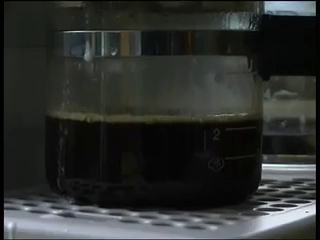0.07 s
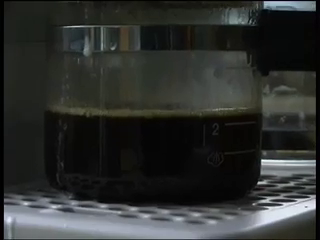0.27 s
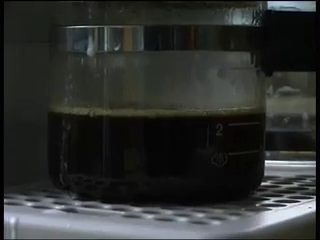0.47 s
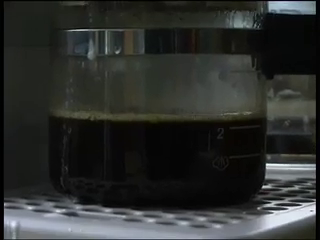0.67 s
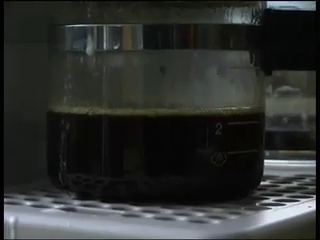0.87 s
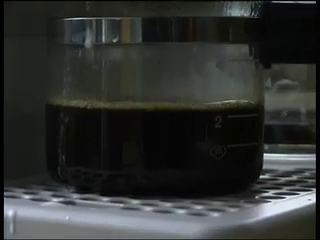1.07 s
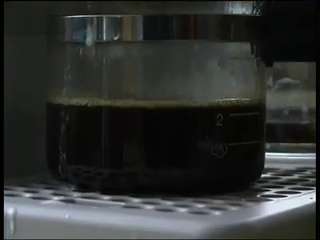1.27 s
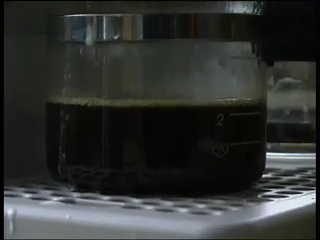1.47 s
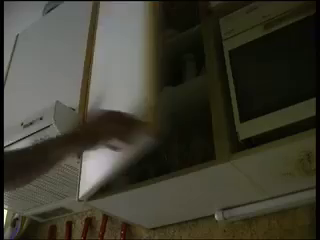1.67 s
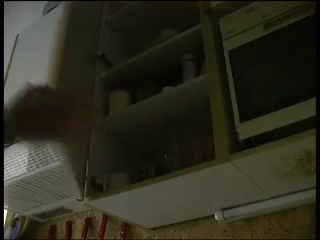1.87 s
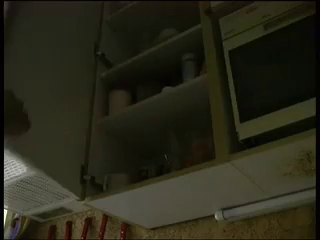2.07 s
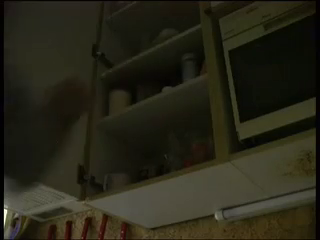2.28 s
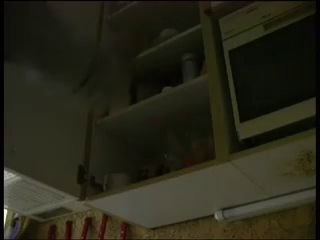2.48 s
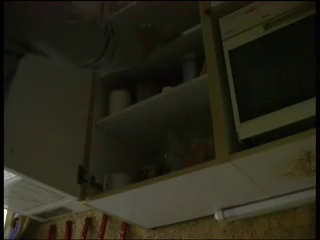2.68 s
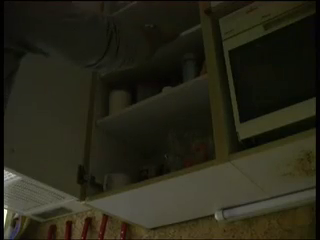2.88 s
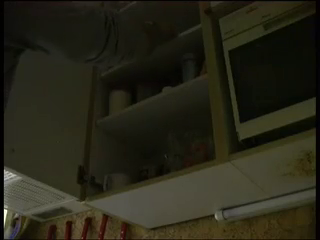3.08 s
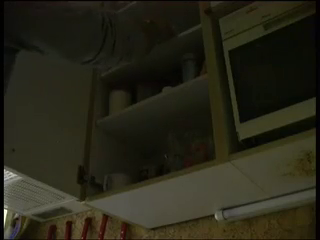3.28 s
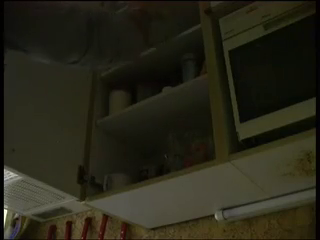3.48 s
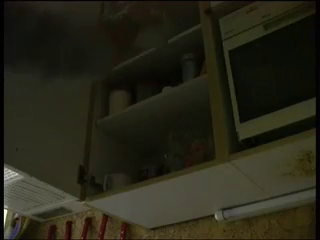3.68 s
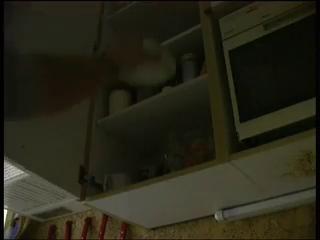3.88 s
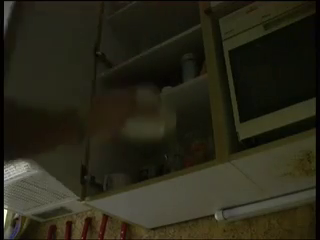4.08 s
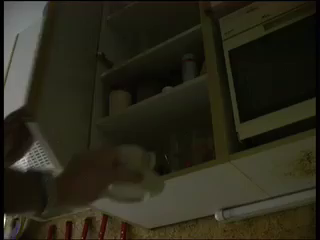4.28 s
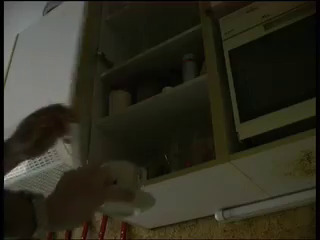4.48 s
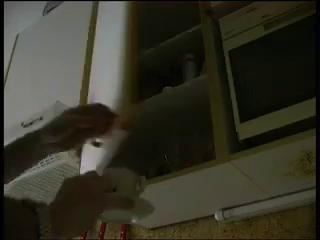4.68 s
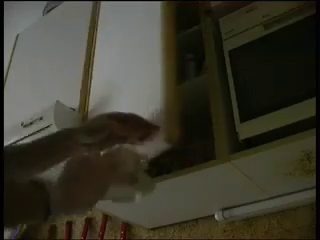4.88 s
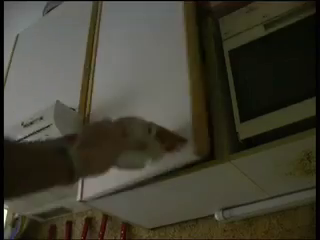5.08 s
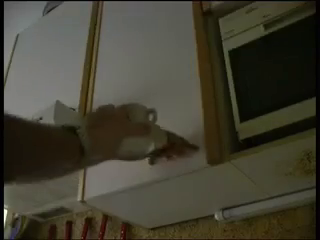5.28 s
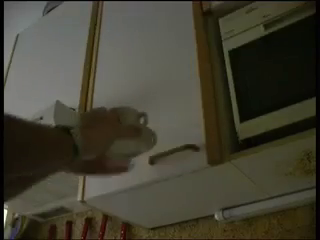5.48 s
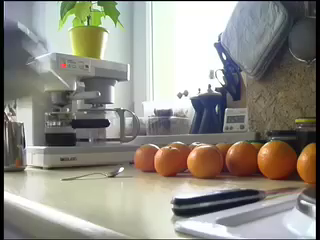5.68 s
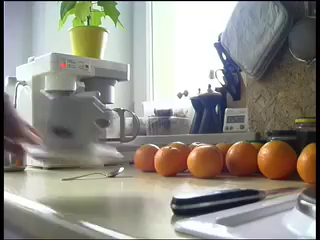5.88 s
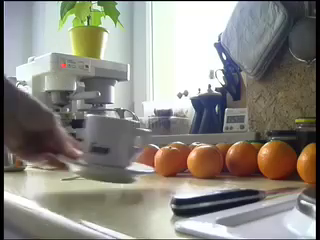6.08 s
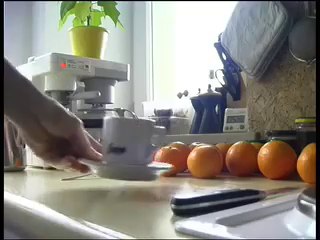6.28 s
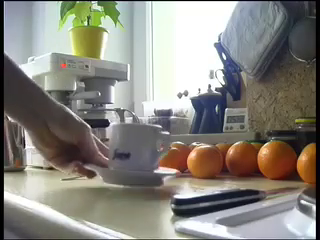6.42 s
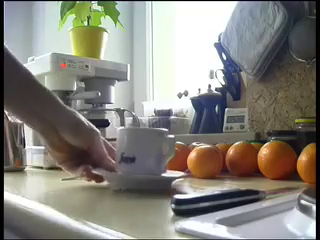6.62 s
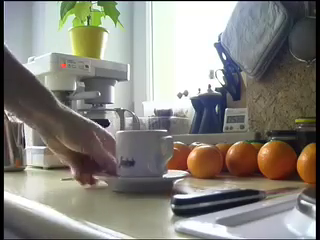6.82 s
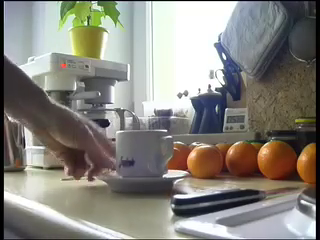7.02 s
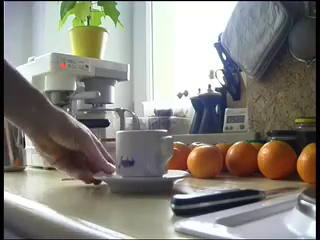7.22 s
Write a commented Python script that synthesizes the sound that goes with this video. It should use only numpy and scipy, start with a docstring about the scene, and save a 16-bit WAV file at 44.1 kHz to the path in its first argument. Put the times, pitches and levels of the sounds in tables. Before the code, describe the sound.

From 0 to 1.6 s a coffee maker is heard close up: quick irregular, hollow low-mid plops with tiny rebounds, over quiet simmer, low mains hum and faint hiss. At about 1.65 s the background changes and grows slightly fuller; plops become stronger but sparser, with soft low thuds and a brief high hinge hiss near 2.1 s. At 2.35 s a cupboard door knocks woodenly against its stop. Around 2.7 s a cup scrapes and clacks off the shelf. From 3 to 5 s there are gurgles, faint china ticks and sleeve brushes. At 5.3 s the door bangs shut, loudest of all, rattling glasses and leaving a low boom until 5.8 s. Then it is quieter, with dull china ticks, before crockery clacks on the counter at 6.6 and, brighter, 6.87 s. A few weak bubbles remain as the hiss sinks until about 7.4 s. Short room reverberation, mono.

```python
"""A drip coffee maker plops steam bubbles through its water pipe in a small kitchen, over mains hum and hiss.
Each plop is a short swelling sine with weaker rebounds that ring the housing; filtered noise simmers below.
A cupboard door swings open against its stop, a cup scrapes off the shelf, the door bangs shut, and cup and
saucer are set down on the counter in two clacks: noise bursts that excite modes of wood, glass and china.
Brushes, thuds and a low boom are shaped noise and a sine; a decaying noise tail gives the room."""
import sys
import numpy as np
from scipy import signal
from scipy.fft import rfft, irfft
from scipy.io import wavfile
from scipy.ndimage import uniform_filter1d

SR = 44100
rng = np.random.default_rng(int(sys.argv[2]) if len(sys.argv) > 2 else 0)


def generate_wav(sig):
    """Save sig (samples, or channels by samples) to the path in sys.argv[1] as 16-bit PCM at SR."""
    pcm = np.round(np.clip(np.atleast_2d(sig).T, -1, 1) * 32767).astype(np.int16)
    wavfile.write(sys.argv[1], SR, pcm)


N = 321930  # length in samples

# Steady sound in three stretches. Each row: start in seconds, then relative levels in dB of hum, hiss, simmer.
STRETCHES = [(0, -64, -61, -63.5), (1.63, -59, -60, -62), (5.79, -64, -61, -64.5)]


def undb(db):
    """Level to amplitude: 20 dB is a factor of ten."""
    return 10 ** (np.asarray(db) / 20)


def unit(x):
    """Normalisation to an RMS of 1."""
    return x / np.sqrt(np.mean(x ** 2))


def top(x, db):
    """Normalisation to a peak level in dB."""
    return x * undb(db) / np.max(np.abs(x))


def add(out, s, x):
    """Superposition: sound x is added to out from s seconds on."""
    a = max(int(s * SR), 0)
    out[a:a + len(x)] += x[:N - a]


def colour(x, points, tilt_db=0):
    """Minimum-phase filter, by cepstral folding, with the gain of (Hz, dB) points plus a tilt around 1 kHz."""
    hz = np.maximum(np.fft.rfftfreq(4096, 1 / SR), 20)
    p = np.array(points)
    gain_db = np.interp(np.log(hz), np.log(p[:, 0]), p[:, 1]) + tilt_db * np.log2(hz / 1000)
    cepstrum = irfft(np.log(undb(gain_db)))
    cepstrum[1:2048] *= 2  # fold the negative times onto the positive ones
    cepstrum[2049:] = 0
    impulse_response = irfft(np.exp(rfft(cepstrum)))
    return signal.fftconvolve(x, impulse_response)[:len(x)]


def band(x, hz, width):
    """Second-order resonance with gain 1 at its centre."""
    return signal.lfilter(*signal.iirpeak(hz, hz / width, SR), x)


def ring(x, modes, even=False):
    """Modal synthesis: decaying modes driven by x; even = each mode reaches its own peak dB."""
    out = 0
    for hz, db, t60 in modes:
        decay = np.log(1000) / (min(t60, .6) * SR)  # a fall of 60 dB in t60
        pole = np.exp(2j * np.pi * hz / SR - decay)
        mode = signal.lfilter([1], [1, -pole], x).imag
        out = out + (top(mode, db) if even else undb(db) * mode)
    return out


def walk(rate):
    """Slow random modulation: normal draws held 1 / rate seconds and smoothed over the same time."""
    k = int(SR / rate)
    held = np.repeat(rng.standard_normal(N // k + 1), k)
    return uniform_filter1d(held, k)[:N]


def stroke(t, length):
    """Asymmetric Gaussian envelope: a gesture swells fast and fades slower."""
    return np.exp(-(t / (length * np.where(t < 0, .7, 1.5))) ** 2)


def stretch_gain(column):
    """Stepwise gain per sample from one column of the stretches, smoothed into quick changeovers."""
    p = np.array(STRETCHES)
    row = np.searchsorted(p[:, 0] * SR, np.arange(N), side="right").clip(1) - 1
    return undb(uniform_filter1d(p[row, column], size=1500))


def coffee_maker():
    """Bubble collapse: a few cycles swell fast, die and rebound; the housing resonates, fed also by the simmer."""
    # Steam bubbles collapsing in the pipe. Each row: nominal peak time in seconds, relative peak level in dB.
    plops = [(0.003, -31), (0.035, -29), (0.052, -27.5), (0.11, -31.5), (0.143, -30.5), (0.205, -29.5),
             (0.241, -30), (0.258, -28), (0.322, -28), (0.47, -34), (0.534, -30), (0.603, -34.5),
             (0.612, -31), (0.622, -32), (0.691, -32), (0.703, -33.5), (0.815, -31), (0.865, -28.5),
             (1.006, -32), (1.019, -32), (1.08, -32.5), (1.086, -30.5), (1.106, -31.5), (1.112, -37),
             (1.131, -33.5), (1.19, -33), (1.3, -34.5), (1.312, -33), (1.56, -31), (1.657, -25),
             (1.722, -34), (1.744, -32.5), (1.813, -39), (1.952, -34), (1.997, -28.5), (2.034, -26),
             (2.135, -32.5), (2.149, -29), (2.229, -38), (2.33, -31), (2.579, -29), (2.919, -27.5),
             (2.935, -29), (2.995, -28), (3.144, -24.5), (3.164, -33), (3.522, -28), (3.59, -26.5),
             (3.609, -30.5), (3.941, -26.5), (4.006, -30), (4.151, -26), (4.16, -29), (4.207, -29.5),
             (4.215, -30.5), (4.511, -29), (4.766, -32.5), (4.799, -27), (4.813, -33), (4.826, -28),
             (4.959, -28), (5.04, -34), (5.048, -31.5), (5.071, -32), (5.182, -30.5), (6.329, -33.5),
             (6.351, -37), (6.356, -32), (6.395, -46), (6.801, -40), (6.809, -39), (7.074, -38),
             (7.107, -41), (7.118, -42)]
    # Modes of housing and jug. Each row: frequency in Hz, excitation level in dB, t60 in seconds.
    housing = [(185, -5, .22), (270, -15, .18), (410, -11, .18), (480, -19, .12), (565, -15, .15),
               (650, -18, .12), (700, -17, .12)]
    rebounds, rebound_s = 3, .011  # number, typical spacing in seconds
    first_loss_db, later_loss_db, scatter_db = -9.5, -5.5, 3
    rise_s, fall_s = .0012, .003
    out, t = np.zeros(N), np.arange(SR // 25) / SR
    shape = (1 - np.exp(-t / rise_s)) ** 2 * np.exp(-t / fall_s)
    peak = t[np.argmax(shape)]
    chance = rng.standard_normal((len(plops), rebounds + 1, 3))
    for (s, db), draws in zip(plops, chance):
        for k, (size, late, strong) in enumerate(draws):
            # the pipe sets the pitch, the bubble's size nudges it
            hz = 518 * (1 + (.12 if k else .05) * size)
            cycles = hz * (t - peak) * (1 + 1.0 * t)  # the bubble shrinks, so its pitch climbs a little
            plop = shape * np.sin(2 * np.pi * cycles + 0.25)
            add(out, s - peak - .0004, top(plop, db))
            s += rebound_s * np.exp(0.2007 * late)
            db += (later_loss_db if k else first_loss_db) + scatter_db * np.clip(strong, -1, 1)
    # the housing muffles the edge
    out = signal.sosfilt(signal.butter(3, 950, fs=SR, output="sos"), out)
    fizz = band(rng.standard_normal(N) * undb(2.9 * walk(55)), 520, 410)
    simmer = band(band(fizz, 550, 400), 620, 450)
    simmer = unit(simmer + undb(-32.5) * ring(fizz, housing))
    return out + undb(-44.5) * ring(out, housing) + simmer * stretch_gain(column=3)


def blows(rows, crack, modes, wares, modes_db, grit_db, rise_share, dull_db=0):
    """Impact excitation: a burst of uneven contacts gives a coloured crack and drives modes of wood and wares."""
    out, t = np.zeros(N), np.arange(SR * 3 // 4) / SR
    for s, db, rattle, tilt_db, *wares_db in rows:
        rise = rise_share * rattle  # a long rattle starts softer
        force = rng.standard_normal(len(t)) * undb(grit_db * walk(700)[:len(t)])
        force *= (1 - np.exp(-t / max(rise, 1e-4))) ** 2 * np.exp(-t / max(rattle, 1e-3))
        force[int(rise * SR)] -= 12 * np.exp(-rise / .001)  # a hard edge lands as one clean click
        x = top(colour(force, crack, tilt_db), 0)
        x += top(ring(force, modes, even=True), modes_db)
        for ware, ware_db in zip(wares, wares_db):
            # dull_db per octave above 2500 Hz
            muffled = [(hz, g - dull_db * np.log2(hz / 2500), t60) for hz, g, t60 in ware]
            x += undb(ware_db) * ring(force, muffled, even=True)
        add(out, s, top(x, db))
    return out


def cupboard_door():
    """Impact on wooden panels: the door hits its stop, then the cupboard frame, and shakes the glasses inside."""
    # Blows. Each row: start in seconds, relative peak level in dB, rattle decay constant in seconds,
    # crack tilt in dB per octave, gain in dB of the shaken glasses.
    opening = [(2.345, -16.5, 0.0064, 0.5, -52), (2.349, -9.5, 0.014, 2, -53),
               (2.364, -11.5, 0.022, -1, -36), (2.405, -32, 0.053, 3.5, -24)]
    shutting = [(5.274, -27.5, 0.0041, 2.5, -52), (5.285, -30.5, 0.036, 0, -53),
                (5.306, -15.5, 0.0062, -1.5, -50), (5.31, 0.5, 0.02, -1, -58), (5.334, -9, 0.025, 0.5, -32),
                (5.42, -25.5, 0.031, -3, -24)]
    # Modes of the door at its stop, the closed cupboard and the glasses.
    # Each row: frequency in Hz, relative peak level in dB, t60 in seconds.
    stop_modes = [(75, -6, .25), (91, 0, .25), (145, -8, .18), (221, -5, .1), (470, -11, .08),
                  (1020, -10, .07)]
    cupboard_modes = [(62, -7, .3), (82, -3, .28), (100, -1, .28), (150, -5, .2), (269, -3, .15),
                      (479, -6, .12), (754, -9, .08), (2300, -16, .05)]
    glass_modes = [(3130, -2, .22), (5450, -3, .05), (5600, -1, .08), (6290, -3, .045)]
    # Crack spectra before tilt. Each row: frequency in Hz, gain in dB.
    stop_crack = [(24, -48), (40, -9), (97, 9), (184, -7.5), (377, -2.5), (483, -15.5), (752, -13),
                  (830, -14.5), (1010, -17.5), (5540, -35.5), (14500, -55.5)]
    cupboard_crack = [(24, -39), (45, -17), (85, 0), (180, -9.5), (480, -13), (900, -16), (2200, -20.5),
                      (2900, -31), (5000, -36.5), (7500, -46), (13000, -52), (14500, -79)]
    out = blows(opening, stop_crack, stop_modes, [glass_modes], modes_db=-6.5, grit_db=1.0, rise_share=.14)
    out += blows(shutting, cupboard_crack, cupboard_modes, [glass_modes],
                 modes_db=-6.5, grit_db=3.0, rise_share=0.084)
    return out


def crockery():
    """Contact of stiff china with wood: a cup scrapes off the shelf, then cup and saucer clack onto the counter."""
    # Contacts. Each row: start in seconds, relative peak level in dB, rattle decay constant in seconds,
    # crack tilt in dB per octave, cup gain in dB; on the counter also saucer gain in dB.
    on_shelf = [(2.662, -34, 0.022, 0, -41), (2.678, -23.5, 0.02, 1, -14), (2.692, -16.5, 0.0092, 1.5, -18),
                (2.708, -21.5, 0.023, 0, -16), (2.742, -34.5, 0.019, -4, -13),
                (2.767, -34, 0.035, 1.5, -42)]
    on_counter = [(6.5848, -15.5, 0.0068, -1.6, -54, -27), (6.609, -23.5, 0.0079, -0.57, -35, -28),
                  (6.866, -20.5, 0.0064, -0.15, -40, -53), (6.87, -13, 0.012, 1, -21, -42.5),
                  (6.94, -34, 0.0089, -1.5, -29, -42)]
    # Modes of wood and china. Each row: frequency in Hz, relative peak level in dB, t60 in seconds.
    shelf_modes = [(487, -2, 0.1), (583, 3, 0.12), (738, 0.5, 0.14), (1020, 2, 0.062), (1542, -14, 0.22),
                   (1780, -11, 0.18)]
    counter_modes = [(235, -8.5, .12), (418, 3, 0.09), (650, -6, 0.08), (733, -3, 0.08), (1105, -4, 0.07),
                     (2040, -5.5, .08)]
    cup_modes = [(2440, -2, .12), (2490, -4, .1), (3381, -4, .07), (3666, -5, .35), (5350, -11, .11),
                 (5290, -12, .06), (7741, -6, .085), (7825, -9, .07), (8468, -17, .05), (11250, -14, .04)]  # levels before the muffling on the shelf
    saucer_modes = [(3661, -2, .4), (5981, -1, .085), (6050, -5, .05)]
    # Crack spectra before tilt. Each row: frequency in Hz, gain in dB.
    shelf_crack = [(35, -39), (60, -13), (293, -20), (596, -1), (1750, -5.5), (1920, -11), (2470, -7.5),
                   (6800, -36.5), (7980, -62), (14500, -66)]
    counter_crack = [(35, -41), (85, -10), (150, -14), (235, -1), (330, -19.5), (480, 4), (1110, -3.5),
                     (2700, -12.5), (3800, -25), (6500, -37.5), (14500, -41)]
    out = blows(on_shelf, shelf_crack, shelf_modes, [cup_modes],
                modes_db=-9, grit_db=2.0, rise_share=.16, dull_db=7)
    out += blows(on_counter, counter_crack, counter_modes, [cup_modes, saucer_modes],
                 modes_db=-11.5, grit_db=8.0, rise_share=.05)
    return out


def clinks():
    """Selective modal excitation: small dull china ticks whose modes near the struck pitch speak loudest."""
    # The cup rocks on its saucer in the hand. Each row: start in seconds, relative peak level in dB, pitch in Hz.
    contacts = [(3.076, -42, 1080), (3.209, -40, 1320), (3.2287, -51, 1600), (3.4885, -54, 2500),
                (3.65, -55, 1100), (3.703, -46, 1500), (3.9856, -48, 1210), (4.3995, -53, 1390),
                (5.5826, -56, 1150), (5.7817, -42, 2300), (6.0393, -34.5, 1080), (6.152, -37, 1080),
                (6.294, -42.5, 900)]
    # China modes. Each row: frequency in Hz, level in dB before the weighting by pitch, t60 in seconds.
    china_modes = [(800, -8, .02), (1090, 0, .028), (1340, -2, .028), (1560, -4, .022), (2050, -7, .018),
                   (2420, -8, .018)]
    out, t = np.zeros(N), np.arange(SR // 4) / SR
    for s, db, hz in contacts:
        force = rng.standard_normal(len(t)) * np.exp(-(t / 0.005) ** 2)
        modes = [(f, g - 11. * abs(np.log2(f / hz)), t60) for f, g, t60 in china_modes]
        tick = ring(force, modes, even=True) + .15 * band(force, 1500, 1600)
        add(out, s, top(tick, db))
    return out


def thuds():
    """Structure-borne sound: hinge, steps and arms thud through the furniture as low band noise."""
    # Each row: centre in seconds, relative level in dB, length scale in seconds.
    rows = [(1.697, -44.5, 0.067), (1.906, -51.5, 0.064), (2.022, -42, 0.081), (2.22, -53, 0.065),
            (2.703, -52, 0.13), (3.05, -59.5, .12), (5.045, -60.5, 0.16), (5.546, -49, 0.11),
            (6.07, -60.5, 0.075)]
    time = np.arange(N) / SR
    rumble = unit(band(band(rng.standard_normal(N), 90.4, 44), 87, 99))
    return rumble * sum(undb(db) * stroke(time - s, length) for s, db, length in rows)


def cupboard_boom():
    """Lightly damped resonance: the shut cupboard booms on low and long, until the third stretch begins."""
    start_s, hz, start_db, t60_s = 5.36, 46.3, -44, 2.1
    time = np.arange(N) / SR
    since = np.maximum(time - start_s, 0)
    boom = undb(start_db - 60 * since / t60_s) * np.sin(2 * np.pi * hz * since)
    return boom * (time < STRETCHES[2][0])


def brushes():
    """Friction noise: sleeves and hands brush along, and near 2.1 s a hinge hisses high up."""
    # Each row: centre in seconds, relative level in dB, length scale in seconds, centre frequency in Hz.
    rows = [(1.681, -65.5, 0.037, 1480), (1.819, -59.5, 0.032, 1420), (2.035, -57, 0.015, 2900),
            (2.087, -53.5, 0.009, 10400), (2.112, -56, .008, 10500), (2.141, -57.5, 0.0088, 12000),
            (2.263, -56, 0.031, 3670), (2.973, -55.5, 0.071, 2200), (3.38, -57, 0.041, 2740),
            (3.754, -65.5, 0.021, 4000), (4.169, -61, 0.06, 3400), (4.689, -61.5, 0.064, 3320),
            (4.862, -56.5, 0.077, 3720), (5.021, -59, 0.031, 3950), (5.799, -62, 0.027, 2500),
            (6.316, -61.5, 0.076, 2600), (7.122, -63, 0.022, 5000)]
    out, t = np.zeros(N), np.arange(-SR // 4, SR // 4) / SR
    for s, db, length, hz in rows:
        friction = rng.standard_normal(len(t)) * undb(1.8 * walk(152.4)[:len(t)])
        brush = unit(band(friction, hz, min(2.1 * hz, 6000)))
        brush = unit(band(brush, hz, min(2.0 * hz, 9000)))
        add(out, s + t[0], undb(db) * brush * stroke(t, length))
    return out


def mains_hum():
    """Harmonic tone: a low sine with its weaker second harmonic."""
    hum_hz, t = 49.2, np.arange(N) / SR
    hum = np.sin(2 * np.pi * hum_hz * t) + undb(-15) * np.sin(4 * np.pi * hum_hz * t)
    return np.sqrt(2) * hum * stretch_gain(column=1)


def broad_hiss():
    """Coloured noise plus narrow bands that flicker; all of it dies away towards the end."""
    # Hiss spectrum. Each row: frequency in Hz, gain in dB.
    spectrum = [(35, -46), (60, -14), (140, -26.5), (300, -21), (544, -5.5), (861, -23.5), (2310, -39),
                (4000, -24.5), (7200, -33), (10500, -39.5), (14500, -30.5)]
    # Narrow bands. Each row: centre in Hz, width in Hz of the first resonance, mean level in dB re the hiss.
    whistles = [(3344, 230, -13.5), (3480, 35, -13), (5675, 440, -11.5), (8670, 960, -8),
                (12100, 1500, -12.5)]
    sinks_from_s, sink_db_per_s = 5.9, -7
    t = np.arange(N) / SR
    noise = unit(colour(rng.standard_normal(N), spectrum))
    for hz, width, db in whistles:
        whistle = unit(band(band(rng.standard_normal(N), hz, width), hz, 2 * width))
        noise += undb(db + 0.54 * walk(14)) * whistle
    noise *= undb(sink_db_per_s * np.maximum(t - sinks_from_s, 0))
    return noise * stretch_gain(column=2)


def kitchen_air():
    """Amplitude-modulated band noise: the mid-band air of the kitchen drifts and wavers in level."""
    # Each row: time in seconds, relative level in dB before the wavering.
    levels = [(0, -74.5), (1.6, -77.5), (1.64, -65), (3.3, -63), (4.5, -71.5), (5.3, -63.5), (6.5, -70.5),
              (7.0, -65), (7.3, -69.5)]
    air = unit(band(rng.standard_normal(N), 1000, 1200)) * undb(2. * walk(4.67))
    return air * undb(np.interp(np.arange(N) / SR, *np.array(levels).T))


def room(x):
    """Diffuse reverberation: octave-spaced bands of noise, each with its own decay, behind a short build-up."""
    # Each row: frequency in Hz, t60 in seconds.
    room_t60 = [(60, 0.39), (300, 0.35), (1000, 0.33), (4000, 0.19), (12000, 0.54)]
    t, p = np.arange(SR * 3 // 4) / SR, np.array(room_t60)
    tail = 0
    for hz in 60 * 2. ** np.arange(8):
        t60 = np.interp(np.log(hz), np.log(p[:, 0]), p[:, 1])
        tail = tail + band(rng.standard_normal(len(t)), hz, hz) * np.exp(-np.log(1000) * t / t60)
    tail *= 1 - np.exp(-t / 0.0038)
    return signal.fftconvolve(x, tail / np.sqrt(np.sum(tail ** 2)))[:N]


def scene():
    """Superposition of the direct sources, their reverberation and the background."""
    maker, door, china, ticks = coffee_maker(), cupboard_door(), crockery(), clinks()
    wet = room(undb(-13.5) * maker + undb(-9.5) * door + undb(-6.0) * china + undb(-3.5) * ticks)
    movement = thuds() + cupboard_boom() + brushes()
    background = mains_hum() + broad_hiss() + kitchen_air()
    return (maker + door + china + ticks + wet + movement + background)[None]


def record(dry):
    """Band limiting and saturation: cuts the deepest bass, rounds the loudest peaks and cuts the top."""
    top_hz = 14000
    dry = signal.sosfilt(signal.butter(3, 36, "high", fs=SR, output="sos"), dry)
    dry = 0.96 * np.tanh(dry / 0.85)
    return signal.sosfilt(signal.ellip(8, .2, 70, top_hz, fs=SR, output="sos"), dry)


dry = scene()
out = record(dry)
generate_wav(out)
```